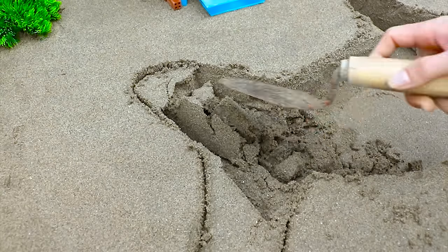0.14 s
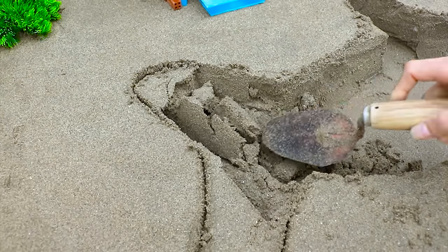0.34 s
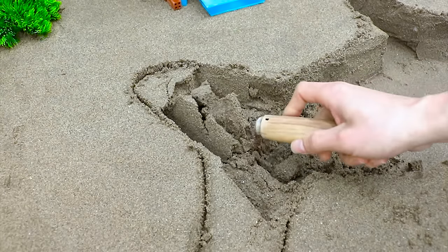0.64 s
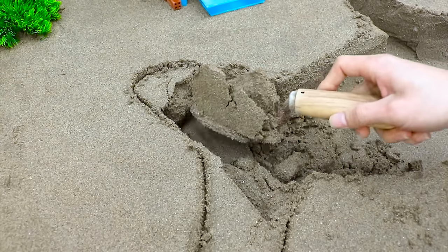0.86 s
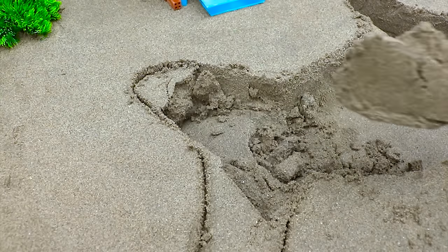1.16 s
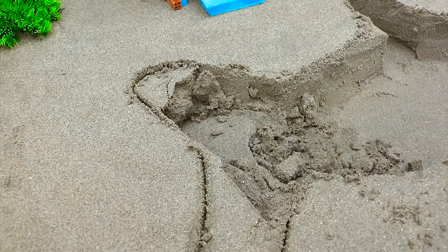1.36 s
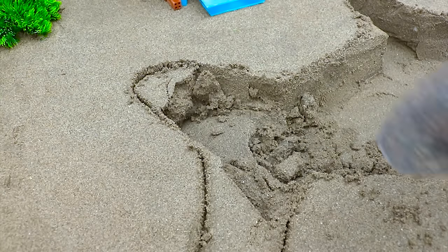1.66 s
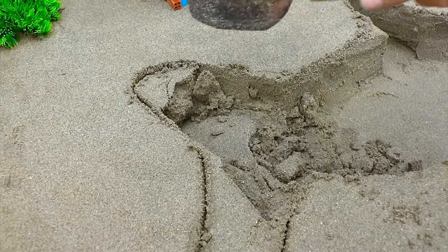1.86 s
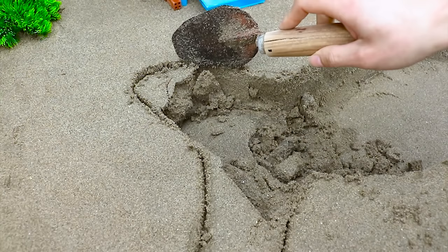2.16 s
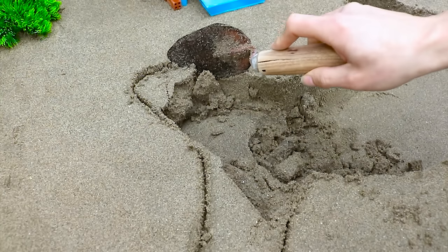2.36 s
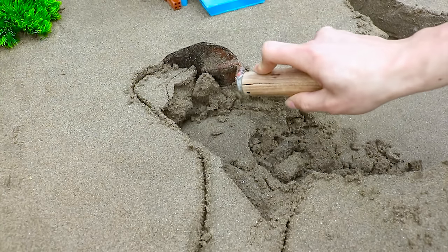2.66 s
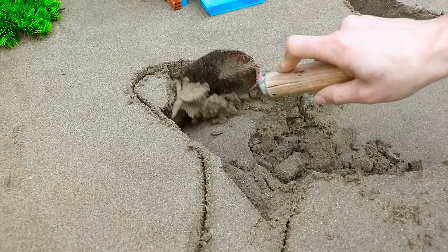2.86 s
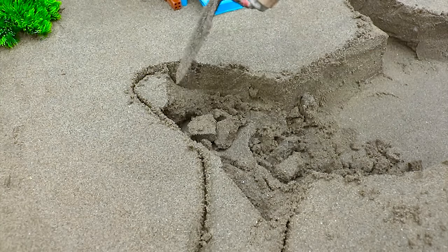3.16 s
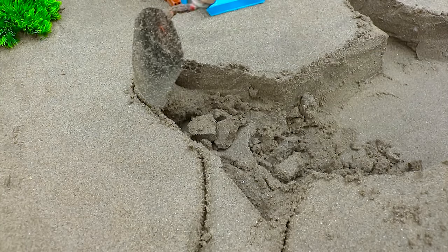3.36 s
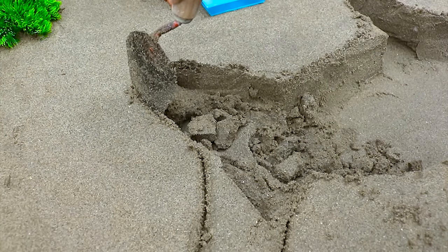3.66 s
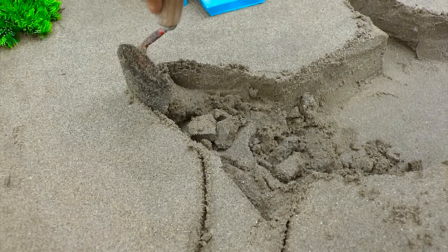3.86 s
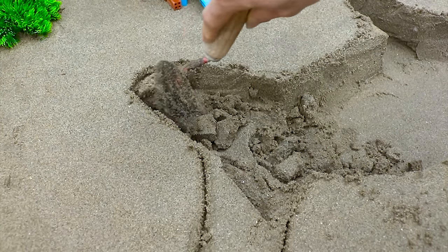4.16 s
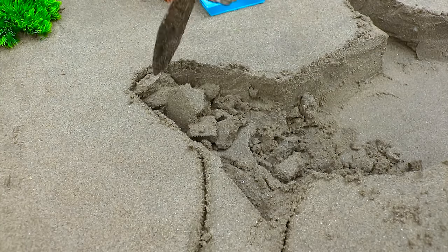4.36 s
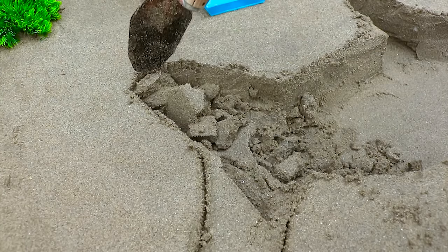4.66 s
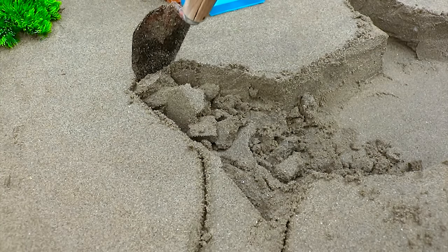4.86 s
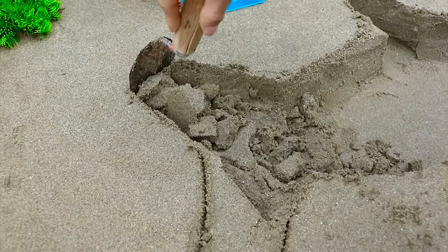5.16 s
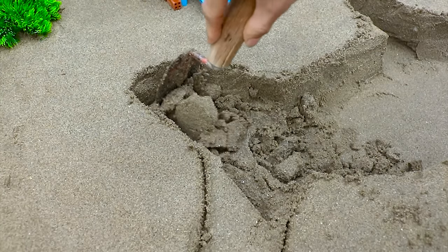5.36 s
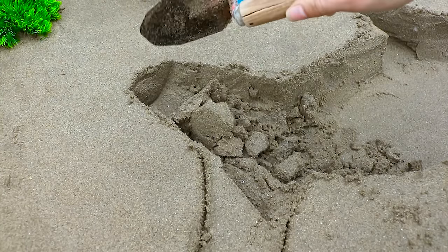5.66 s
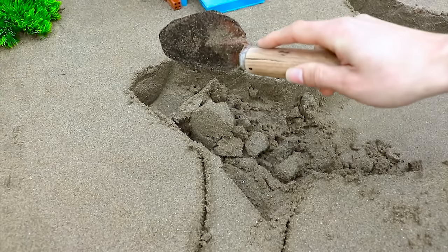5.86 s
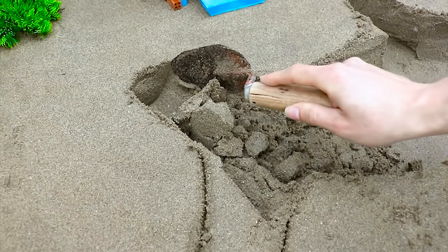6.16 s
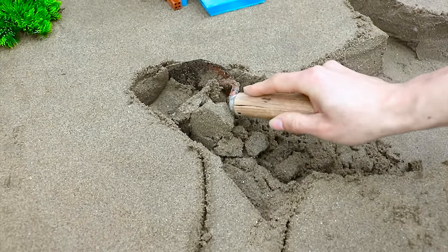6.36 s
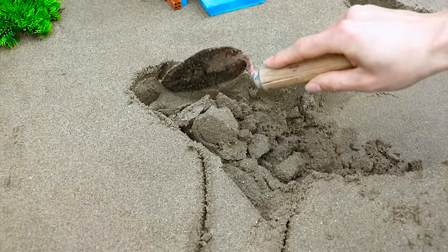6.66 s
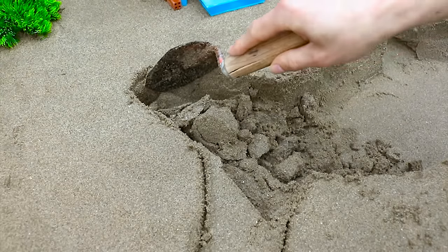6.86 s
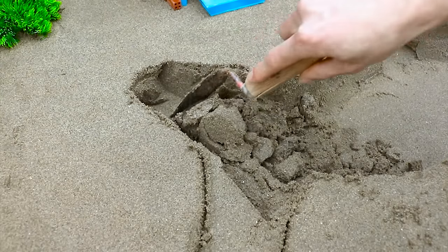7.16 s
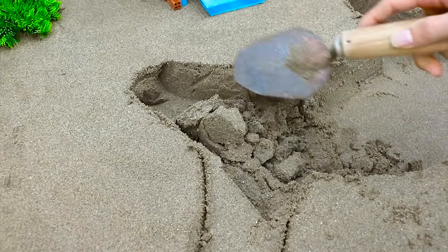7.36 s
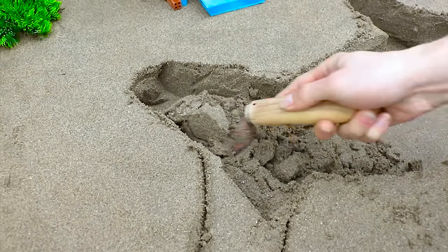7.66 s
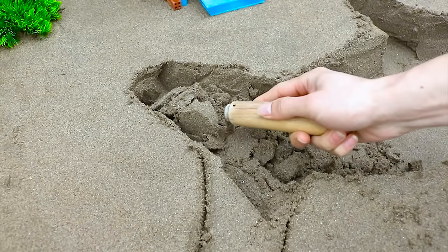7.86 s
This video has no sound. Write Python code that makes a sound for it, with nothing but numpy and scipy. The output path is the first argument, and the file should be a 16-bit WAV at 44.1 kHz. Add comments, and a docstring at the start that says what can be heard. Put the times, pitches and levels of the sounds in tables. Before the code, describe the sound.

A small steel shovel works damp sand close to the microphone, slightly to the right, over a faint outdoor hush. Each stroke mixes a fine grainy hiss, a packed crunch and a faint metallic ring. One stroke ends just at the start, and a scoop follows from 0.4 to 1.2 seconds. Two crunchy digs begin with light ticks at 2.3 and 3.7 seconds. Hissier chops come at 4.9, 6.2 and 6.9, each about half a second long, then a last shove from 7.6 to 8.

A nearby thrush-like bird, echoing among trees, gives five rising whistles between 0.4 and 1.5 seconds, then brief chatter and a clear note around 2. It trills softly at 5.6 and 6.1, and sings louder swooping and falling whistles from 6.5 to 7.6. Smaller birds chirp faintly further off from about 2 seconds onward.

```python
"""Shovel in damp sand, with birds

A small steel shovel works through damp sand close to a pair of microphones, a little to the right.
Fine grains hiss along the blade, packed sand crunches and the steel rings faintly. A thrush-like bird
whistles and trills among echoing trees; smaller birds call further off, over a faint outdoor hush."""
import sys
import numpy as np
from scipy import signal
from scipy.fft import rfft, irfft, next_fast_len
from scipy.io import wavfile

SR = 44100
rng = np.random.default_rng(int(sys.argv[2]) if len(sys.argv) > 2 else 0)


def generate_wav(signal):
    """Clip the signal to [-1, 1] and save it as 16-bit WAV at the path in sys.argv[1]."""
    frames = np.transpose(np.atleast_2d(signal))
    scaled = np.clip(frames, -1, 1) * 32767
    pcm = np.round(scaled).astype(np.int16)
    wavfile.write(sys.argv[1], SR, pcm)


N = 353241

# Spectra of the outdoor air, fine grains, packed sand and the thud through the ground.
# Each row: frequency in Hz, relative level in dB.
HUSH_SPECTRUM = [(18, -49.5), (30, -19.5), (109, -9), (152, -23), (281, -8), (328, -17.5), (521, -11.5),
                 (806, -15.5), (917, -13), (1660, -24.5), (1790, -19.5), (3400, -24), (5690, -34.5),
                 (12000, -37.5), (14000, -66)]
HISS_SPECTRUM = [(500, -19.5), (1200, -8), (2500, 1.5), (3400, 2), (5000, 2.5), (7500, -6.5), (9800, -6.5),
                 (11500, -16), (15500, -18)]
CRUNCH_SPECTRUM = [(100, -28), (200, -7.5), (340, -2.5), (600, -3.5), (1000, -3.5), (2000, -5),
                   (4000, -26.5)]
THUD_SPECTRUM = [(20, -18), (35, -4.5), (50, 4), (80, -5.5), (115, -3.5), (170, -2.5), (260, -23)]
# How alike a noise is at the two microphones. Each row: frequency in Hz, likeness from 0 to 1.
MIC_LIKENESS = [(30, 0.76), (300, 0.71), (1000, 1), (2400, 0.74), (6000, 0.79), (9000, 0.09), (15000, 0.63)]

# The shovel's strokes, the first already under way. Each row: start in seconds, kind of stroke.
STROKE_STARTS = [(-.421, "chop"), (.44, "scoop"), (2.321, "dig"), (3.7416, "dig"), (4.931, "chop"),
                 (6.1534, "chop"), (6.9132, "chop"), (7.57, "shove")]
# The course of each kind. Each row: seconds into the stroke, hiss in dB, crunch in dB,
# finest dust in dB relative to the hiss.
STROKE_SHAPES = { "scoop": [(0, -52.5, -66, 10), (.035, -39.5, -66, -1), (.09, -39, -44.5, 6.5),
                 (.151, -32, -40.5, -1), (.21, -36, -36, -2), (.333, -40.5, -36, -10.5),
                 (.355, -60, -44.5, -16), (.464, -56.5, -52, -10), (.58, -52, -59, -4),
                 (.604, -50, -56.5, -8), (.674, -59, -59.5, -7), (.698, -55.5, -52, -4),
                 (.728, -75, -71, -5)], "dig": [(0, -47, -73, 6), (.006, -41, -48.5, 2),
                 (.046, -39.5, -37.5, 0), (.066, -45.5, -43.5, -4), (.198, -37.5, -42, 1),
                 (.234, -47, -41.5, -8), (.264, -45.5, -45, 0), (.289, -36, -39.5, -1),
                 (.298, -44.5, -41.5, -3), (.38, -40.5, -42.5, -4), (.49, -57.5, -51.5, -7),
                 (.543, -52.5, -56.5, 0), (.645, -66, -62.5, -3), (.67, -80, -69, -10)],
                 "chop": [(0, -41, -54, 6), (.008, -37, -56.5, 4), (.064, -31.5, -45, 3),
                 (.114, -38.5, -47.5, -1), (.225, -40.5, -46, -1.5), (.331, -43.5, -52, -2.5),
                 (.384, -55, -64.5, 3), (.415, -50.5, -58.5, 5), (.446, -61.5, -63.5, 4),
                 (.504, -63, -61.5, 10), (.514, -68, -60, -3)], "shove": [(0, -41, -53, 10),
                 (.024, -37.5, -45, -1), (.072, -42, -46, 2), (.118, -36.5, -40.5, 1), (.162, -35, -45, 2),
                 (.168, -32, -44, 6), (.2, -32.5, -38.5, -4), (.23, -34.5, -41, -1), (.248, -44, -43, -4),
                 (.276, -44.5, -45, -2), (.394, -37.5, -47.5, -1), (.45, -42, -45, 1)], }
# What each kind digs through. Each row: pitch and width of the hollow in Hz; hollow, thud and grit
# in dB relative to the crunch; sheen and blade ring in dB relative to the hiss.
STROKE_GROUND = {"scoop": (368, 57, 3.5, -6.5, 0, -10, -4.5), "dig": (292, 72, -2.5, -6, -2.5, -26, -4.5),
                 "chop": (664.5, 98, 2.5, 0.5, -4.5, -9, -3), "shove": (280, 94, -1.5, -4.5, 1, -10, -2.5)}
# The steel blade's modes. Each row: frequency in Hz, level in dB, seconds to fall by 60 dB.
BLADE_MODES = [(647, -10.5, 0.029), (2280, 2, 0.11), (3448, 3.5, 0.11), (4780, 5.5, 0.038),
               (5730, -14.5, 0.037), (5940, -5.5, .035), (9000, -15, 0.041), (9190, -18, .03),
               (9470, -4, 0.073), (9940, -14, 0.043), (13100, -26.5, .04)]
# Where the blade bites or knocks. Each row: seconds into the stroke, level in dB,
# frequency in Hz that the place of contact favours.
BLADE_BITES = {"scoop": [(.015, -34.5, 3440), (.04, -47, 3420)], "dig": [(.003, -27.5, 4860),
               (.004, -34, 2280), (.034, -37, 2270), (.285, -50, 4700)], "chop": [(.008, -35.5, 3420),
               (.007, -58, 6240), (.318, -41, 2240), (.364, -45.5, 3420), (.381, -42, 2280),
               (.389, -45.5, 3420), (.409, -53, 3420), (.433, -47, 3420), (.454, -61.5, 3420)],
               "shove": [(.002, -47, 4870), (.176, -33, 4830)]}

# The near bird's whistles, harsh chatter and two-voiced trills, then the far birds' calls.
# Each row: start, glide and hold in seconds, first and last pitch in Hz, level in dB.
SONG_NOTES = [(.408, 0.011, 0.0084, 1840, 2080, -49.5), (.44, 0.037, 0.0061, 1303, 2025, -36.5),
              (.655, 0.032, 0.013, 1553, 1980, -27), (.892, 0.041, 0.021, 1405, 2006, -28),
              (1.135, .04, 0.03, 1340, 1945, -27.5), (1.397, 0.03, 0.042, 1330, 1923, -28),
              (1.945, .011, 0.011, 1814, 2189, -38.5), (2.0, 0.0066, 0.013, 2146, 2640, -44),
              (2.11, 0.013, .004, 1800, 2730, -39), (2.127, 0.013, 0.0022, 1890, 2660, -39.5),
              (2.142, 0.0072, 0.0051, 2050, 2630, -24.5), (2.275, .011, 0.011, 2380, 3082, -29.5),
              (2.7, 0.024, 0.0066, 3376, 3187, -37), (7.362, 0.086, 0.018, 2850, 2207, -25.5),
              (7.5, 0.089, 0.0071, 3044, 2584, -28)]
CHATTER_NOTES = [(1.965, .016, 0.014, 1350, 1740, -44), (2.013, 0.012, 0.0043, 1240, 1930, -43.5),
                 (2.09, 0.015, .006, 1277, 2000, -41.5), (2.108, 0.0091, 0.0077, 1410, 1825, -44.5)]
TRILL_NOTES = [(5.625, 0.065, .09, 1760, 1990, -40), (5.64, 0.049, .065, 2300, 2500, -45),
               (6.088, .025, 0.036, 1700, 2000, -38), (6.0855, 0.023, 0.025, 2600, 2490, -45)]
FAR_NOTES = [(2.128, .025, .004, 5020, 3970, -53.5), (2.158, .012, 0.0051, 4200, 4900, -55),
             (2.185, 0.023, 0.014, 4170, 4890, -51), (3.0, 0.037, 0.0081, 2264, 2034, -60),
             (3.36, 0.031, 0.009, 3130, 2740, -52), (3.37, 0.012, .015, 1800, 1760, -72.5),
             (3.415, 0.023, 0.0056, 2340, 2086, -55.5), (3.52, 0.032, 0.0057, 2294, 2130, -56.5),
             (4.445, 0.011, 0.012, 3530, 3420, -69.5), (4.485, .01, .02, 1740, 1820, -70.5),
             (4.555, 0.027, 0.0032, 3130, 2600, -60.5), (4.595, .015, .01, 2470, 2195, -59.5),
             (4.602, .016, .003, 5170, 4300, -73.5), (4.622, 0.012, 0.017, 4850, 5140, -67),
             (4.65, 0.01, .002, 5100, 4560, -74), (5.445, 0.032, 0.058, 533, 520, -64),
             (5.63, 0.033, 0.029, 5250, 4560, -61.5), (5.73, .025, 0.004, 4580, 3740, -60.5),
             (5.89, 0.041, 0.0046, 3550, 3050, -57), (5.935, 0.028, .005, 2930, 2670, -49),
             (5.98, 0.019, .02, 5320, 5050, -61), (6.03, 0.027, 0.0033, 4730, 3750, -71),
             (6.078, 0.012, 0.018, 4080, 4360, -62.5), (6.76, 0.045, 0.0036, 5020, 4000, -57),
             (6.815, 0.03, 0.0036, 3990, 4550, -61), (7.35, 0.079, .005, 5110, 4010, -56.5),
             (7.83, 0.093, 0.016, 3900, 4150, -61)]
# The near bird's longer figures. Each row: starts in seconds, then a curve whose points give
# seconds into the figure, pitch in Hz, level in dB.
SONG_FIGURES = [([6.47, 7.012], [(0, 2690, -42), (.01, 2540, -36), (.052, 2090, -26), (.08, 2077, -29.5),
                (.098, 2313, -28.5), (.108, 2616, -38), (.126, 3096, -29), (.16, 3049, -25.5),
                (.23, 2760, -27.5), (.243, 2900, -63.5)]), ([.862, 1.109, 1.368], [(0, 2274, -45.5),
                (.006, 2400, -40.5), (.018, 2700, -44.5), (.028, 2905, -55)]), ([2.158], [(0, 1820, -37),
                (.006, 2371, -30.5), (.036, 2251, -24.5), (.112, 2276, -26.5), (.117, 2350, -49)]),
                ([4.765], [(0, 2100, -62.5), (.008, 2220, -55), (.04, 2610, -49), (.07, 2584, -46),
                (.092, 2335, -70)])]
# A far bird's falling call, part by part. Each row: seconds into the call, pitch in Hz, level in dB.
FALLING_PARTS = [
    [(0, 5880, -59), (.012, 5100, -63), (.022, 4550, -59), (.04, 5360, -62)],
    [(.047, 5240, -45), (.058, 4200, -56), (.072, 3606, -46.5), (.095, 3466, -53), (.135, 3310, -47.5),
     (.158, 3950, -52.5), (.163, 4250, -78)],
    [(.2, 3395, -53), (.212, 3750, -53.5), (.222, 4250, -67.5)],
]
# Its starts in seconds.
FALLING_STARTS = [3.003, 3.354]

HUSH_DB = -68.5
LEFT_LAG_S = 0.00011   # the shovel is nearer the right microphone
FLICKER_DB, FLICKER_HZ = 2.5, 14
SHEEN_HZ, SHEEN_WIDTH_HZ = 9730, 980   # a bright band in the hiss when the blade slides flat
SWELL_DB, TRILL_SWELL_DB, FAR_SWELL_DB, FALL_SWELL_DB = 19, 11.5, 4, 4
GLIDE_EASE, FADE_DB, RELEASE_S, RELEASE_DB = 1.15, 2, .006, 15
TRILL_RATE_HZ, TRILL_SWING_HZ, TRILL_TOP_DB = 80, 552, 6.5
THROAT_HZ = 3970   # a second harmonic above this does not leave the beak
NEAR_T60_S, FAR_T60_S, NEAR_ECHO_DB, FAR_ECHO_DB = 2.57, 3.3, -3.5, -3
WIDTH, CUTOFF_HZ = 0.52, 16400


def from_db(db):
    """Gain of a level in dB."""
    return 10 ** (np.asarray(db) / 20)


def unit_rms(x):
    """Scale to rms 1."""
    return x / np.sqrt(np.mean(x ** 2) + 1e-20)


def butter(order, hz, kind="low"):
    """Sections of a Butterworth filter."""
    return signal.butter(order, hz, kind, fs=SR, output="sos")


def placed(curve, start):
    """A curve moved to its start time."""
    return np.add(curve, [start] + [0] * (len(curve[0]) - 1))


def follow(curve, fade_s):
    """The samples a curve spans, its columns at each of them, and a gate with soft ends."""
    times, *columns = np.transpose(curve)
    at = np.arange(max(int(times[0] * SR), 0), min(int(times[-1] * SR), N))
    t = at / SR
    gate = np.clip(np.minimum(t - times[0], times[-1] - t) / fade_s, 0, 1)
    return at, [np.interp(t, times, column) for column in columns], gate


def drift(rate_hz):
    """A smooth random wander of rms 1."""
    step = 40
    r = np.exp(-2 * np.pi * rate_hz * step / SR)
    slow = signal.lfilter([1], [1, -2 * r, r * r], rng.standard_normal(N // step + 2002))[2000:]
    return np.interp(np.arange(N) / step, np.arange(len(slow)), unit_rms(slow))


def resonance(x, hz, width_hz):
    """One resonance, gain 1 at its peak."""
    r = np.exp(-np.pi * width_hz / SR)
    feedback = [1, -2 * r * np.cos(2 * np.pi * hz / SR), r * r]
    return signal.lfilter(np.array([1, 0, -1]) * (1 - r * r) / 2, feedback, x)


def at_mics(pair, spectrum, left_lag_s=0):
    """Two unrelated noises become a partly alike left and right, shaped by a spectrum; rms 1."""
    size = next_fast_len(N)
    hz = np.maximum(np.arange(size // 2 + 1) * SR / size, 1)
    alike, level_db = (np.interp(np.log(hz), np.log(points_hz), values)
                       for points_hz, values in (np.transpose(MIC_LIKENESS), np.transpose(spectrum)))
    mid, side = rfft(pair, size) * from_db(level_db) * np.sqrt([1 + alike, 1 - alike])
    left = (mid + side) * np.exp(-2j * np.pi * hz * left_lag_s)
    return unit_rms(irfft([left, mid - side], size)[:, :N])


def outdoor_hush():
    """Faint, low, nearly steady noise all around the microphones."""
    return from_db(HUSH_DB + 0.23 * drift(0.76)) * at_mics(rng.standard_normal((2, N)), HUSH_SPECTRUM)


def grains(per_s, spread_db, clump_db):
    """Sand grains: two streams of random clicks of uneven size that swell in shared clumps."""
    clumps = from_db(clump_db * (drift(35) + 0.27 * drift(160)))
    sizes = from_db(spread_db * np.minimum(rng.exponential(1, (2, N)), 5))
    signs = rng.choice([-1, 1], (2, N))
    return clumps * sizes * signs * (rng.random((2, N)) < per_s / SR)


def flicker(x):
    """Third-octave bands of the hiss swell and sink independently."""
    below = [signal.sosfiltfilt(butter(2, hz), x) for hz in np.geomspace(700, 15900, 14)] + [x]
    bands = (high - low for low, high in zip(below, below[1:]))
    return unit_rms(below[0] + sum(band * from_db(FLICKER_DB * drift(FLICKER_HZ)) for band in bands))


def blade(forces):
    """The steel's modes, each rung by its own share of the force."""
    out = 0
    for (hz, level_db, t60), force in zip(BLADE_MODES, forces):
        r, w = from_db(-60 / (t60 * SR)), 2 * np.pi * hz / SR
        feedback = [1, -2 * r * np.cos(w), r * r]
        out += signal.lfilter([0, from_db(level_db) * np.sin(w)], feedback, force + 1e-18)
    return out


def sliding_sand():
    """Fine grains slide over steel: hiss, sheen, dust and the blade's ring follow each stroke."""
    hiss, dust, ring, sheen = np.zeros((4, N))
    for start, kind in STROKE_STARTS:
        at, (hiss_db, _, dust_db), gate = follow(placed(STROKE_SHAPES[kind], start), fade_s=0.002)
        *_, sheen_db, ring_db = STROKE_GROUND[kind]
        hiss[at] += gate * from_db(hiss_db)
        dust[at] += gate * from_db(hiss_db + dust_db)
        ring[at] += gate * from_db(hiss_db + ring_db)
        sheen[at] += gate * from_db(hiss_db + sheen_db)
    fine = flicker(at_mics(grains(14000, spread_db=2, clump_db=0.8), HISS_SPECTRUM, LEFT_LAG_S))
    finest = signal.sosfiltfilt(butter(4, 11200, "high"), fine)
    body = fine - finest
    body /= np.std(signal.sosfilt(butter(4, 5500, "high"), body))   # the treble sets the hiss level
    bright = resonance(body, SHEEN_HZ, SHEEN_WIDTH_HZ)
    # the contact wanders over the blade, so each mode is fed unevenly
    rub = grains(3000, spread_db=5, clump_db=0)
    steel = blade(rub * from_db(4.5 * drift(10)) for _ in BLADE_MODES)
    steel = at_mics(steel, [(100, 0), (15000, 0)], LEFT_LAG_S)
    return hiss * body + sheen * bright + dust * unit_rms(finest) + ring * steel


def packed_sand():
    """Damp sand breaks coarsely and rings in the stroke's hollow, with grit above and a thud below."""
    coarse = at_mics(grains(2500, spread_db=2, clump_db=1), CRUNCH_SPECTRUM, LEFT_LAG_S)
    grit = signal.sosfilt(butter(2, 1000, "high"), coarse)
    thud = at_mics(rng.standard_normal((2, N)), THUD_SPECTRUM) * from_db(-7.5 + 0.63 * drift(24))
    out = np.zeros((2, N))
    for start, kind in STROKE_STARTS:
        at, (_, crunch_db, _), gate = follow(placed(STROKE_SHAPES[kind], start), fade_s=0.0012)
        hollow_hz, width_hz, hollow_db, thud_db, grit_db, *_ = STROKE_GROUND[kind]
        sand = coarse[:, at] + from_db(hollow_db) * resonance(coarse[:, at], hollow_hz, width_hz)
        sand += from_db(thud_db) * thud[:, at] + (from_db(grit_db) - 1) * grit[:, at]
        out[:, at] += gate * from_db(crunch_db) * sand
    return out


def bites():
    """The edge goes in: a 2 ms burst of contacts snaps grains and rings the favoured modes most."""
    burst = 90   # samples
    knocks = np.zeros((len(BLADE_MODES), N + SR))
    modes_hz = np.array(BLADE_MODES)[:, :1]
    for start, kind in STROKE_STARTS:
        for time_s, level_db, favoured_hz in placed(BLADE_BITES[kind], start):
            if time_s > 0:
                at = round(time_s * SR)
                share = .2 + .8 * np.exp(-(np.log(modes_hz / favoured_hz) / .08) ** 2)
                contacts = rng.standard_normal(burst) / np.sqrt(burst / 2)
                knocks[:, at:at + burst] += from_db(level_db) * share * contacts
    knocks = knocks[:, :N]
    snap = signal.sosfilt(butter(2, 3000, "high"), knocks.sum(axis=0))
    knocked = blade(knocks) + from_db(-2) * snap
    return np.array([np.roll(knocked, round(LEFT_LAG_S * SR)), knocked])


def glides(notes, swell_db):
    """Curves of time, pitch and level: a note glides, slowing and swelling, then holds and fades."""
    to_go = np.linspace(1, 0, 8)
    curves = []
    for start, glide_s, hold_s, from_hz, to_hz, level_db in notes:
        rise_db = swell_db if to_hz > from_hz else min(swell_db, FALL_SWELL_DB)
        times = start + glide_s * (1 - to_go)
        pitches = to_hz + (from_hz - to_hz) * to_go ** GLIDE_EASE
        levels = level_db - rise_db * to_go ** 2
        end = start + glide_s + hold_s
        held = (end, to_hz, level_db - FADE_DB)
        released = (end + RELEASE_S, to_hz, level_db - FADE_DB - RELEASE_DB)
        curves.append([*zip(times, pitches, levels), held, released])
    return curves


def whistles(curves, swing_hz=0, waver=0.0039, overtone_db=-70):
    """A bird's wavering tone; a trill swings the pitch fast and unevenly, loudest at each top."""
    out, wobble, uneven = np.zeros(N), drift(55), drift(34.5)
    for curve in curves:
        at, (hz, level_db), gate = follow(curve, fade_s=.0025)
        trill_phase = 2 * np.pi * TRILL_RATE_HZ * (at - at[0]) / SR + 0.19 * uneven[at]
        swing = -np.cos(trill_phase) * (swing_hz > 0)
        hz = hz * (1 + waver * wobble[at]) + swing_hz * swing
        phase = 2 * np.pi * np.cumsum(hz) / SR
        second = from_db(overtone_db) * np.clip((THROAT_HZ - 2 * hz) / 400, 0, 1) * np.sin(2 * phase)
        third = from_db(-49) * (hz < 2150) * np.sin(3 * phase)
        level_db += TRILL_TOP_DB * swing + 2.5 * np.abs(swing) * uneven[at]
        out[at] += np.sqrt(2) * gate * from_db(level_db) * (np.sin(phase) + second + third)
    return out


def near_bird():
    """The thrush-like singer: pure whistles, fast trills and chatter with a harsh overtone."""
    figures = [placed(curve, start) for starts, curve in SONG_FIGURES for start in starts]
    song = whistles(glides(SONG_NOTES, SWELL_DB) + figures)
    trills = whistles(glides(TRILL_NOTES, TRILL_SWELL_DB), swing_hz=TRILL_SWING_HZ, waver=0.043)
    chatter = whistles(glides(CHATTER_NOTES, SWELL_DB), waver=0.031, overtone_db=-4.5)
    return song + trills + chatter


def trees(x, t60):
    """Trunks scatter a call into a tail, partly unlike at each microphone; leaves take treble first."""
    t = np.arange(2 * SR) / SR
    noise = rng.standard_normal((2, len(t)))
    dull = signal.sosfilt(butter(2, 3000), noise)
    early = noise * from_db(17 - 60 * t / 0.094)
    late = dull * from_db(-60 * t / t60) + (noise - dull) * from_db(-60 * t / (0.76 * t60))
    common, side = (early + late) * np.clip((t - .004) / 0.0028, 0, 1)
    tails = np.array([common + 0.61 * side, common - .4 * side])
    return signal.fftconvolve(x[None], tails / np.sqrt(np.sum(common ** 2)))[:, :N]


def far_birds():
    """Smaller birds further off: short whistled chips and a falling call, heard twice."""
    falling = [placed(part, start) for start in FALLING_STARTS for part in FALLING_PARTS]
    return whistles(glides(FAR_NOTES, FAR_SWELL_DB) + falling, waver=.016)


def scene():
    """Shovel close in front, one bird near the centre, the others off to the right among the trees."""
    near, far = near_bird(), far_birds()
    birds = near * from_db([[.3], [-.3]]) + far * from_db([[-5], [-3]])
    echoes = from_db(NEAR_ECHO_DB) * trees(near, NEAR_T60_S)
    echoes += from_db(FAR_ECHO_DB) * trees(far, FAR_T60_S)
    hush = outdoor_hush()
    shovel = (sliding_sand() + packed_sand() + bites()) * from_db([[-.7], [.7]])
    return hush + shovel + birds + echoes


def record(dry):
    """The stereo image is narrowed towards the centre; the highest treble is cut."""
    mid, side = (dry[0] + dry[1]) / 2, WIDTH * (dry[0] - dry[1]) / 2
    top_cut = signal.cheby2(16, 80, CUTOFF_HZ, fs=SR, output="sos")
    return signal.sosfilt(top_cut, [mid + side, mid - side])


dry = scene()
out = record(dry)
generate_wav(out)
```